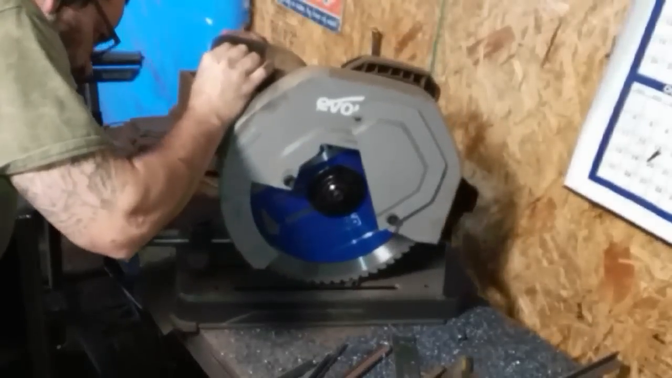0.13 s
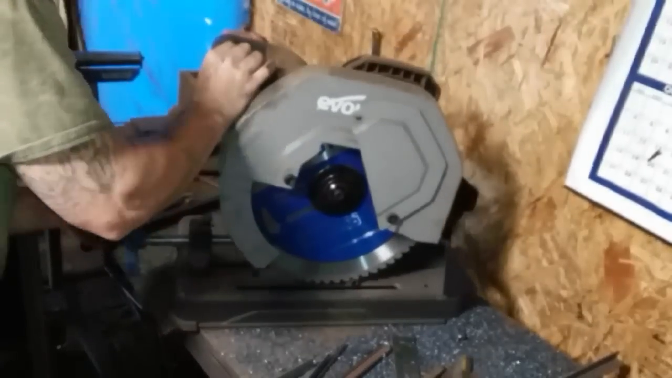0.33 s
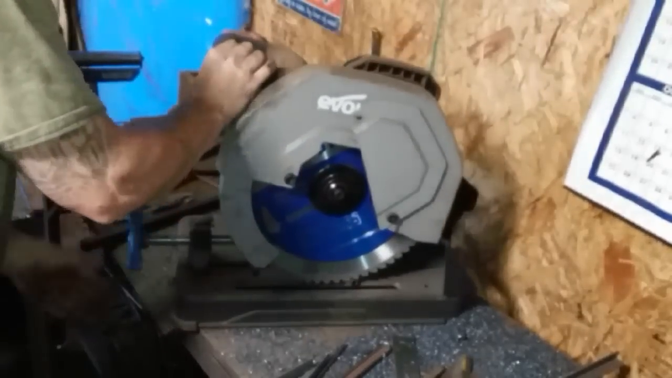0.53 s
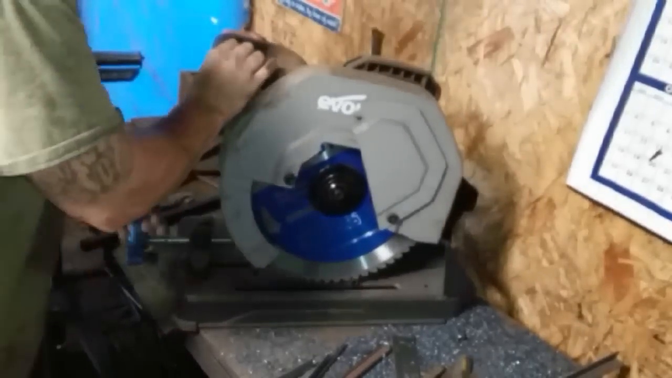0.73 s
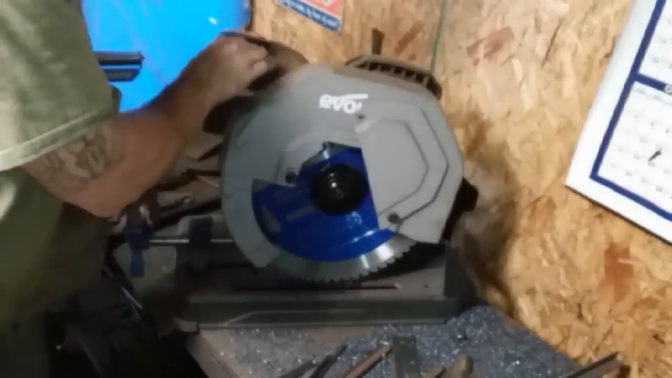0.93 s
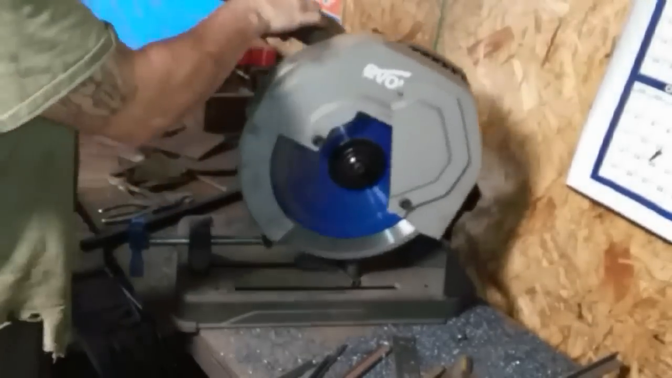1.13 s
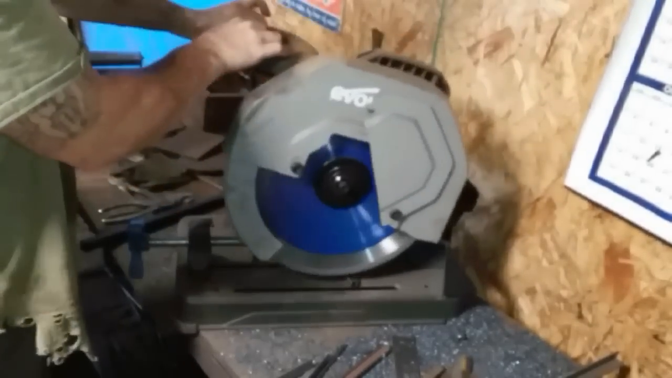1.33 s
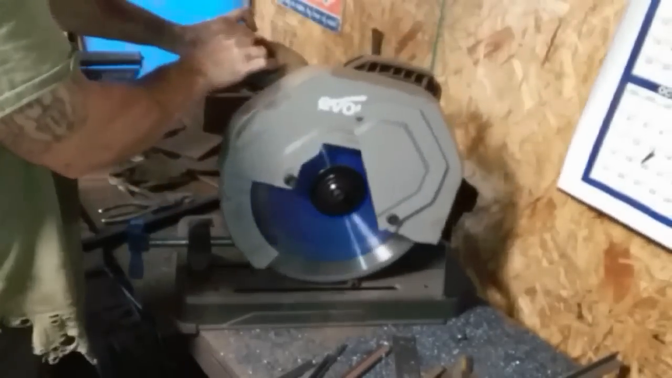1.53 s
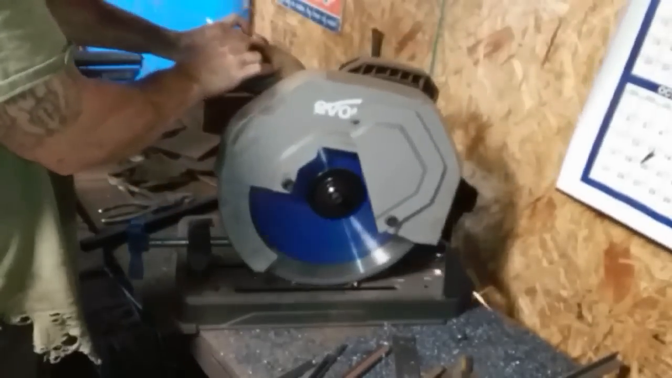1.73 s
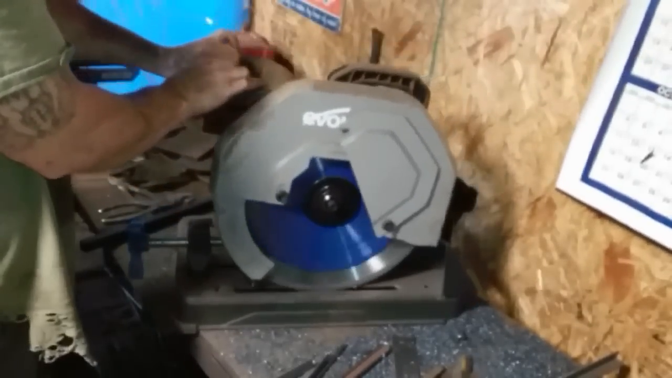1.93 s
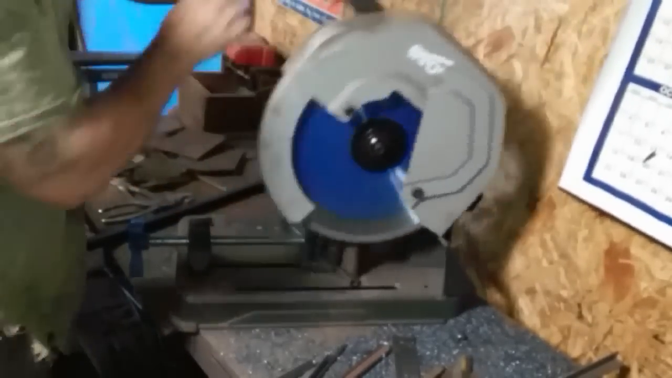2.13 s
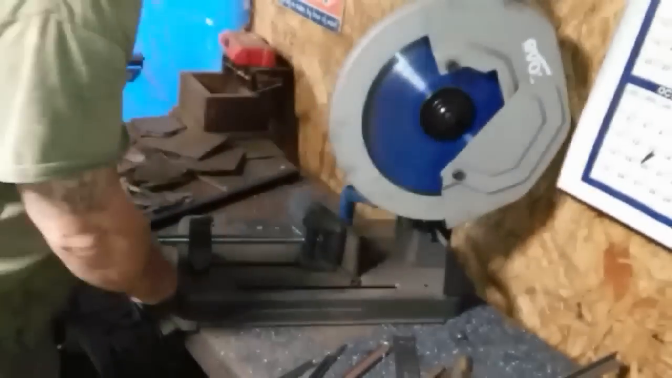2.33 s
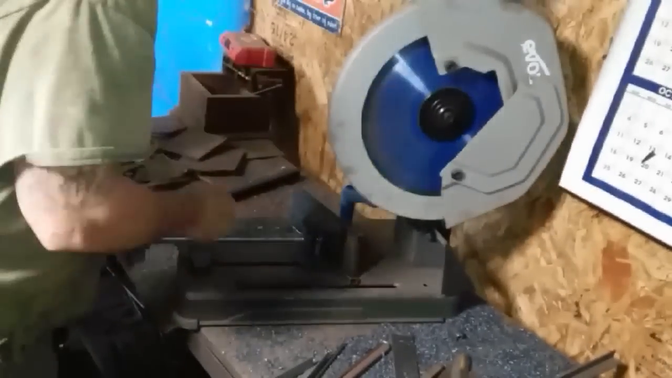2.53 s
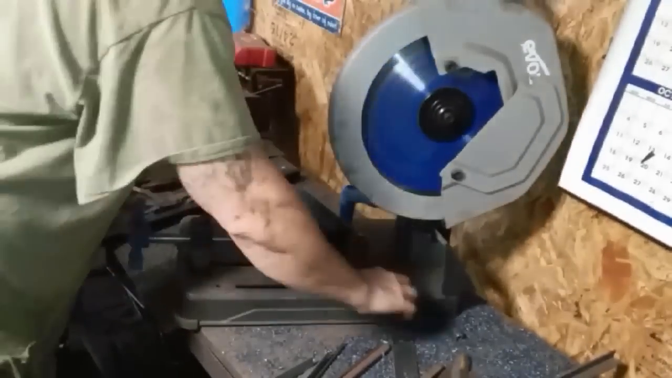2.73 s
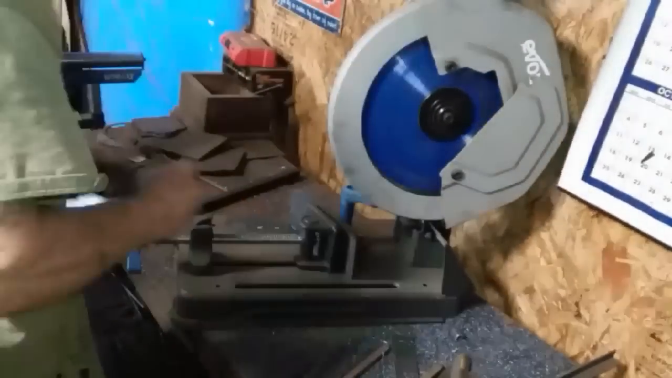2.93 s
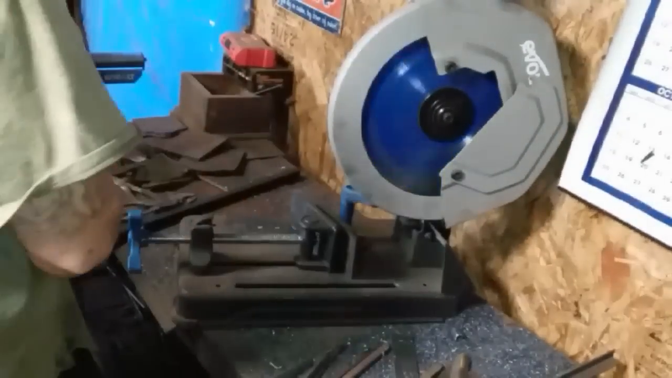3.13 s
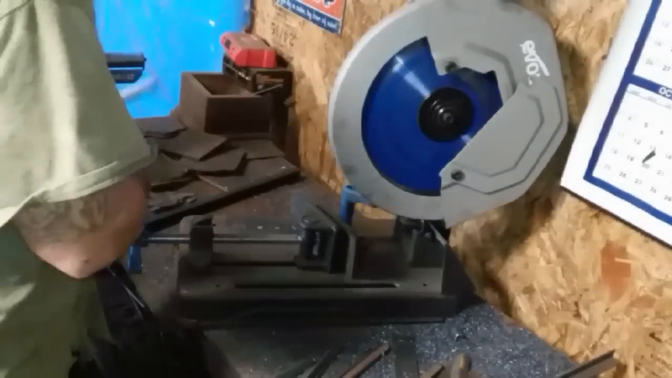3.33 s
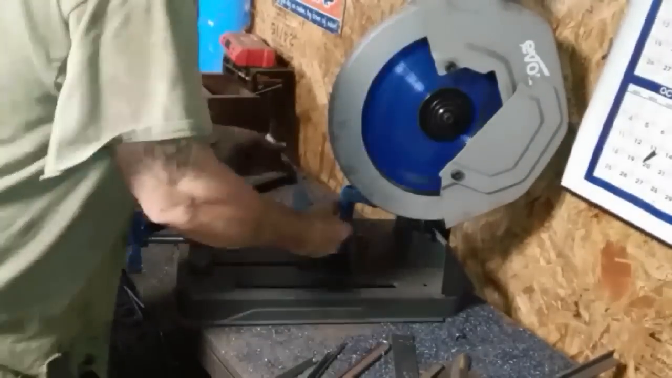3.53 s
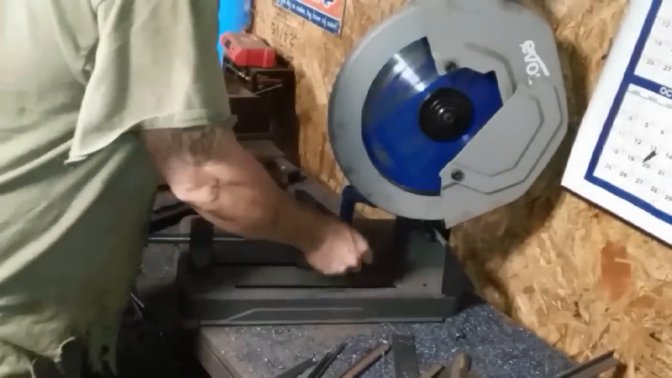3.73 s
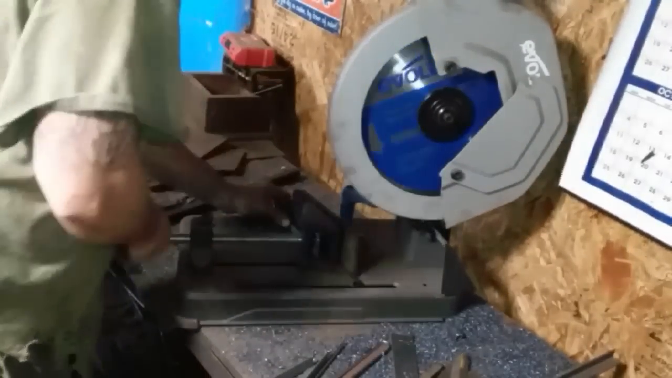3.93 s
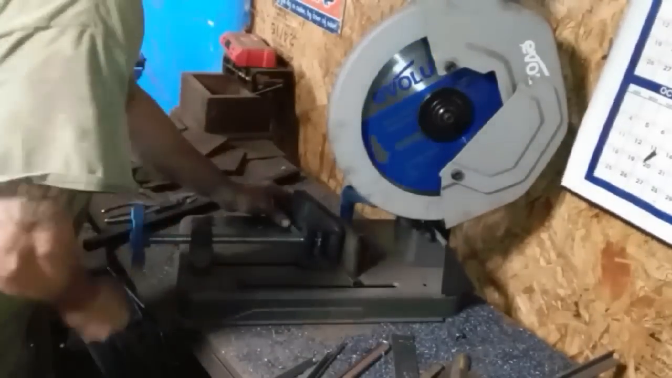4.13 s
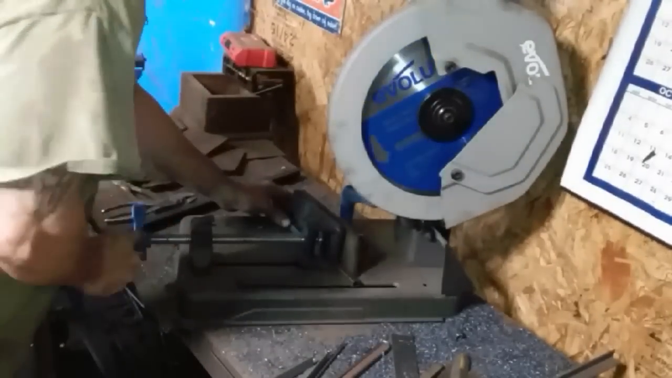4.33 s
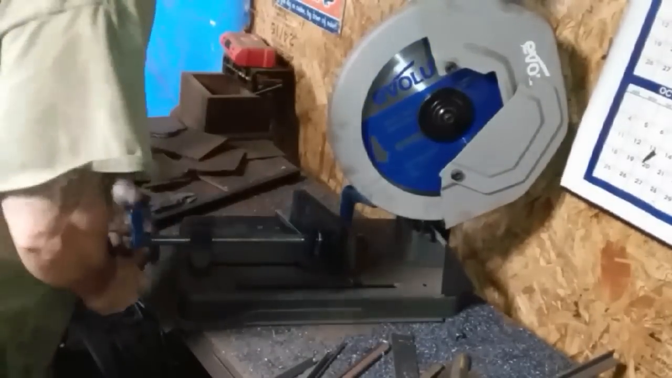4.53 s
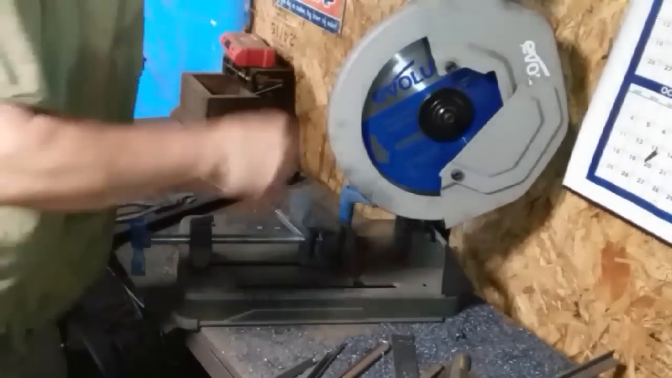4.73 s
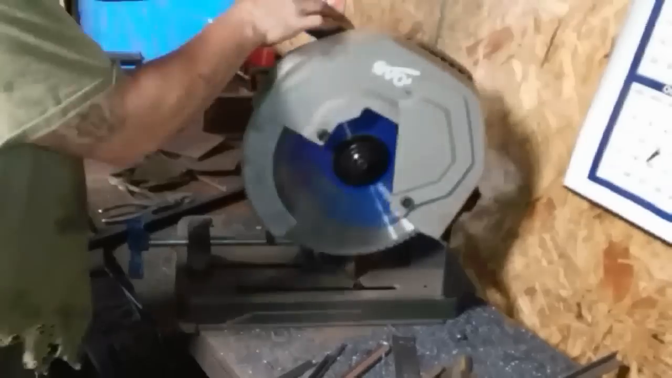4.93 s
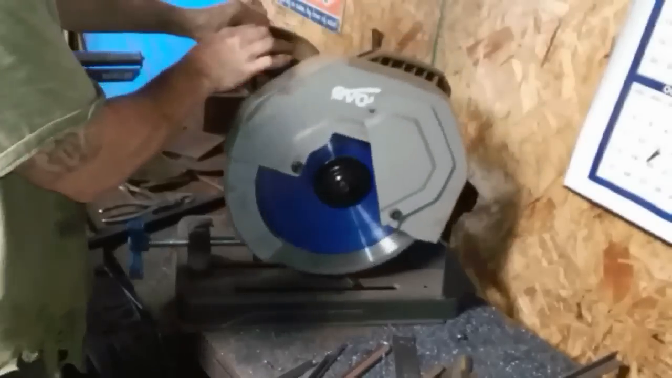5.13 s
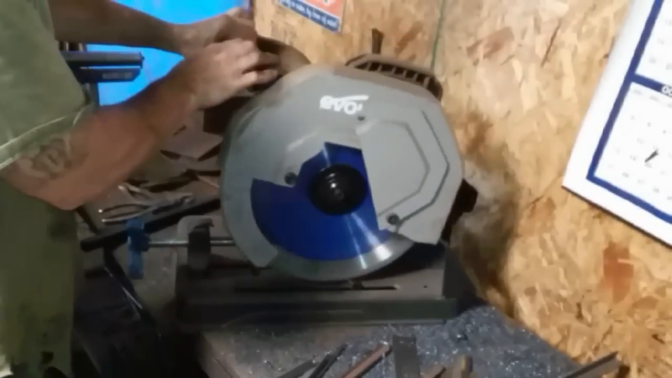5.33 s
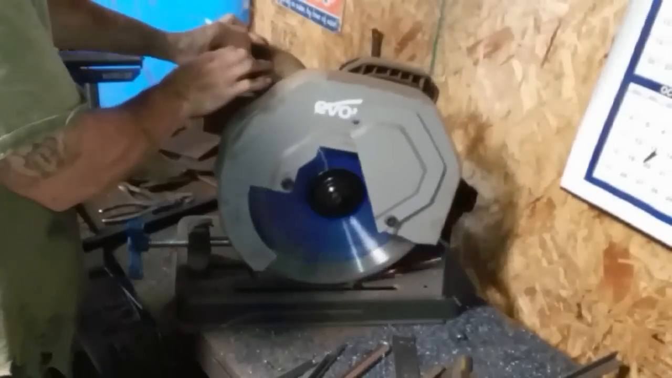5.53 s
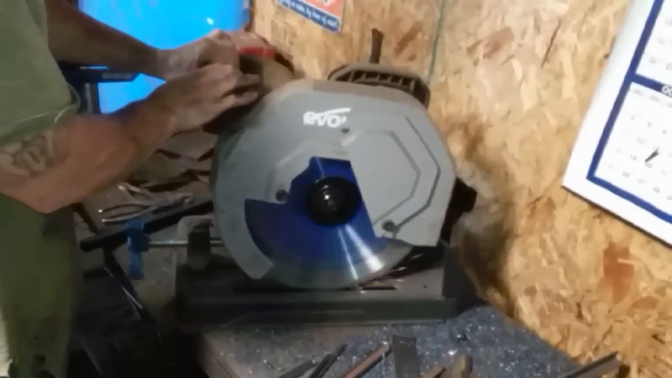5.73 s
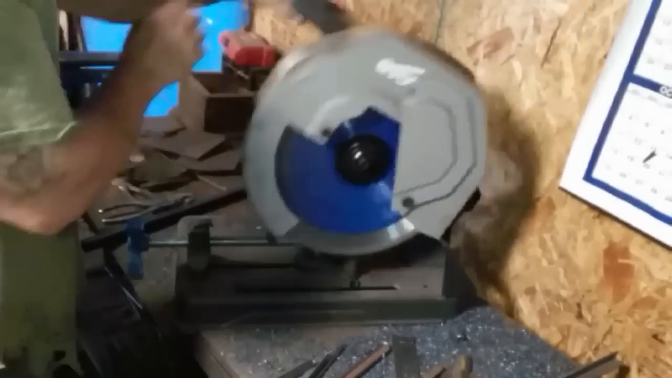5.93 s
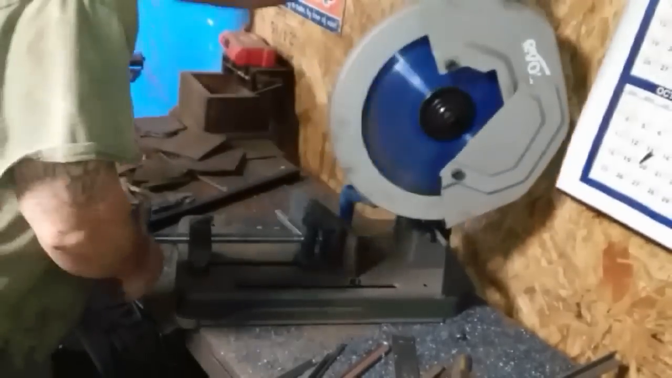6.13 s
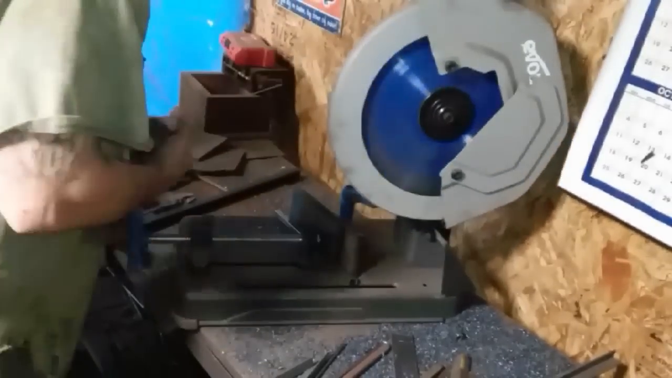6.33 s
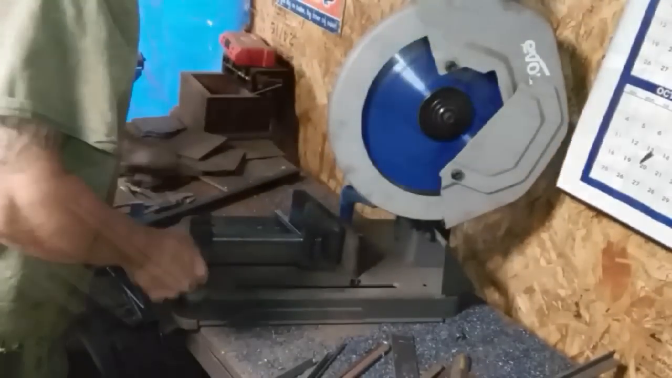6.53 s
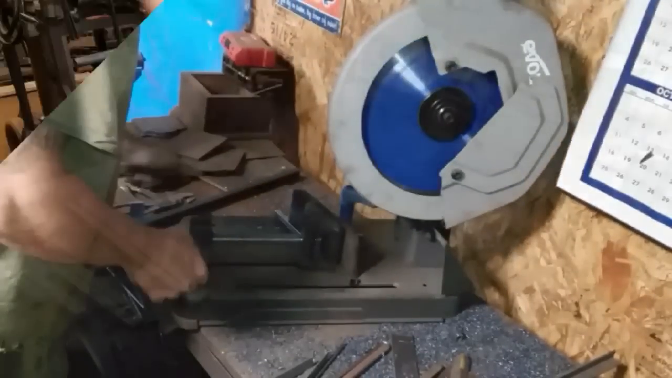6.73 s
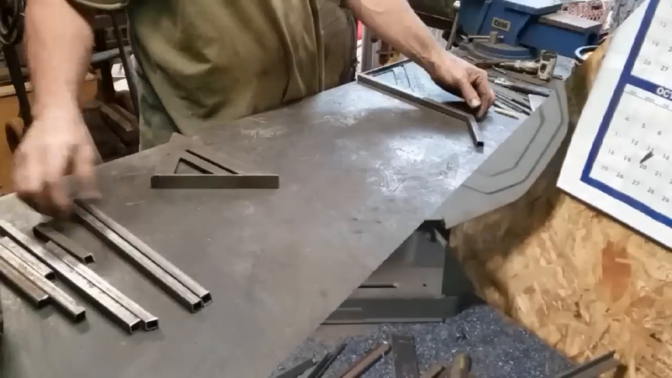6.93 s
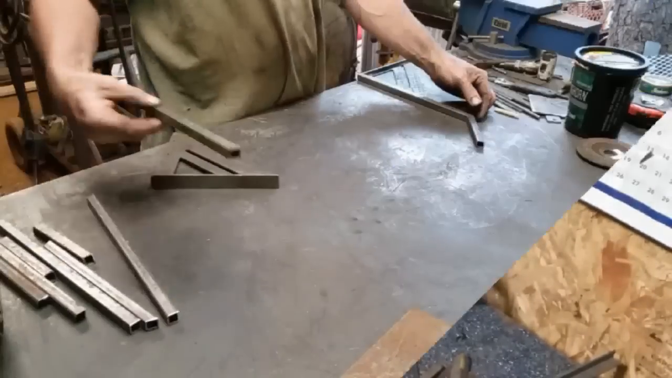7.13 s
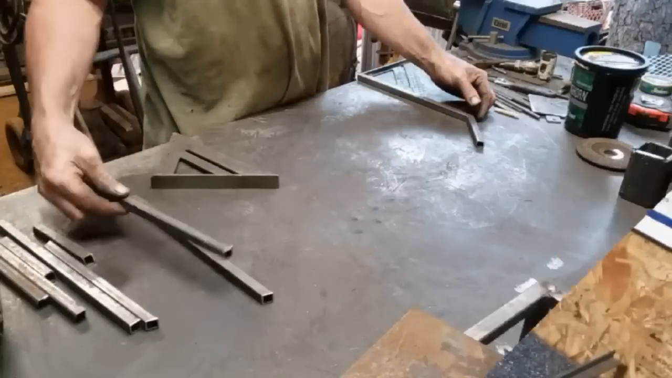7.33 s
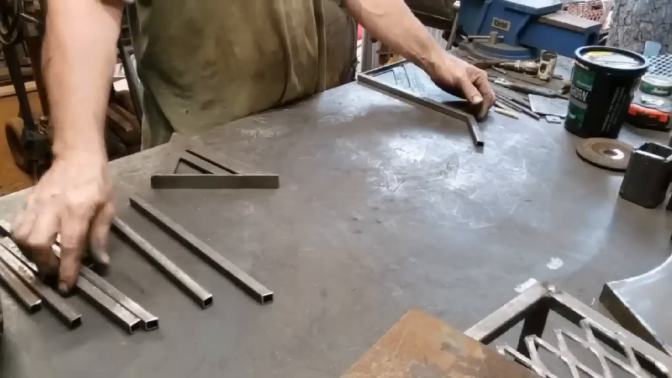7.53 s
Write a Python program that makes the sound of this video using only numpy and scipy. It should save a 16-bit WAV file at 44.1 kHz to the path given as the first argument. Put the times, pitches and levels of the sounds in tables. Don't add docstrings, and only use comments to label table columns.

```python
import sys
import numpy as np
from scipy import signal
from scipy.io import wavfile
from scipy.ndimage import uniform_filter1d

SR = 44100
rng = np.random.default_rng(int(sys.argv[2]) if len(sys.argv) > 2 else 0)


def generate_wav(sig):
    pcm = np.round(np.clip(np.atleast_2d(sig).T, -1, 1) * 32767).astype(np.int16)
    wavfile.write(sys.argv[1], SR, pcm)


def invert_db(x):
    u = np.asarray(x, float) / 20
    return 10 ** u


N = 334719

# (on [s], off [s], coasting drag [1/s], whine lost [s], start thump [dB])
RUNS = [
    (1.14, 2.114, .55, 3.225, -35),
    (4.959, 5.956, .62, 6.5, -38),
]
# (time [s], load [0-1], speed sag [Hz])
CUTS = [
    [(1.6, 0.08, 3.6), (1.7, 0.4, 13), (1.77, 0.55, 40), (1.83, 0.96, 72), (1.95, 0.7, 128),
     (2.04, 0.61, 95), (2.12, 0.27, 21), (2.2, 0.01, 5)],
    [(5.45, 0.07, 5.8), (5.55, 0.36, 31), (5.61, 0.83, 55), (5.67, 1, 270), (5.76, 0.87, 335),
     (5.83, 0.81, 350), (5.89, 0.59, 290), (5.956, 0.61, 108), (6.02, 0, 5)],
]
# (time [s], level on the whine [dB])
WHINE_SWELLS = [
    [(1.17, 2.5), (1.3, 2.5), (1.45, 1.5), (1.58, -1), (1.72, 2), (2.1, -4), (2.2, 2), (2.55, 0),
     (3.2, 1.5)],
    [(4.99, 2), (5.12, 4), (5.25, 0), (5.4, -1.5), (5.55, 0.5), (5.9, -2.5), (6.0, -0.5), (6.2, -1.5),
     (6.45, 0)],
]
# (time [s], level [dB])
CANCELS = [(1.225, -8), (1.256, -6), (1.285, -5), (1.345, -6), (1.406, -8), (1.446, -5), (1.48, -9),
           (1.578, -6), (2.125, -10), (2.242, -7), (2.272, -16), (2.318, -14), (2.362, -15), (2.4, -7),
           (2.432, -11), (2.526, -6), (2.575, -15), (2.74, -8), (2.794, -9), (2.83, -7), (3.0, -6),
           (4.995, -8), (5.039, -14), (5.072, -5), (5.158, -8), (5.206, -8), (5.245, -8), (5.318, -5),
           (5.398, -10), (6.07, -6), (6.15, -7), (6.216, -8), (6.28, -7), (6.36, -14), (6.432, -9)]
# (share of the whine pitch [1], level below it [dB])
SHAFT = [(.078, -11), (.166, -13.5)]
# (frequency [Hz], width [Hz], boost [dB])
PANELS = [(1625, 140, 7.5), (2140, 90, 10), (2390, 58, 6), (2676, 240, 10.5), (2927, 94, 9),
          (3376, 97, 9.5), (3570, 80, 6), (3763, 48, 11.5), (3920, 36, 7.5), (4000, 40, 6), (4180, 120, 9),
          (4310, 40, 6), (4446, 97, 10)]
# (first [dB], second [dB])
BURIED_DB = (-24, -11.5)
# (full speed [dB], added at rest when driven [dB], when coasting [dB],
# added by load [dB], power of the last die-away [1])
LAYERS = [
    (-29, 10, 6.5, -5, 1.09),
    (-22.5, 0.5, -10, -5, 1.15),
    (-32, -11, -14.5, 7.5, 1.2),
    (-64.5, 13, 19, 33, 0.41),
]
BITE = (1.3, 1.4, 0.72, 2.46)
# (frequency [Hz], density [dB/Hz])
RATTLE = [(110, -39.5), (180, -14.5), (402, -8.5), (506, -3), (1040, -1), (1360, -3), (1600, -8.5),
          (2080, -30.5), (3520, -120)]
RUSH = [(880, -9.5), (1500, -5.5), (1650, -2.5), (2160, -4), (2960, -5), (4800, -18.5), (6240, -52),
        (10600, -120)]
FIZZ = [(2710, -16.5), (4600, -4.5), (5630, -3), (7780, -8.5), (8530, -16), (8850, -30), (9000, -41.5),
        (11700, -72), (19800, -120)]
RUMBLE = [(30, -23), (80, -3), (200, -2.5), (320, -1)]
# (frequency [Hz], density [dB/Hz])
SIZZLE = [(8600, -8), (9400, -8), (10500, -5.5), (12300, -1), (14200, -8.5), (15800, -14)]
BEARING = [(10000, -31.5), (11200, -7.5), (12400, -5.5), (13600, -11.5), (14800, -34.5)]
# (frequency [Hz], width [Hz], boost [dB])
HOUSING = [(482.7, 52, 7.5), (705, 89, 3), (1156, 160, 2), (1353, 83, 6), (1700, 48, -2), (2075, 94, 2),
           (2900, 70, 3.5), (3425, 99, 6.5), (3725, 120, 6.5)]
# (frequency [Hz], density [dB/Hz])
PLATE = [(900, -30), (1200, -4.5), (4000, -2), (7000, -6), (8200, -30)]
# (frequency [Hz], width [Hz], boost [dB])
BLADE = [(1207, 40, 12.5), (2075, 40, 14), (2535, 40, 14.5), (2900, 41, 14), (3420, 40, 13.5),
         (3610, 44, 15), (3740, 40, 14.5), (4110, 40, 14), (4760, 40, 11), (5300, 50, 13.5), (5480, 40, 15),
         (6430, 37, 14.5), (6880, 40, 13), (7500, 40, 11)]
# (start [s], end [s])
CUT_SPANS = [(1.55, 2.3), (5.4, 6.1)]
# (time [s], length [s], start pitch [Hz], end pitch [Hz], level [dB])
SQUEALS = [(1.25, 0.29, 1300, 1285, -34), (5.101, 0.39, 1305, 1305, -34.5), (1.74, .06, 2075, 2070, -29),
           (1.8, .22, 7500, 7480, -44), (1.86, 0.23, 6540, 6500, -36.5), (1.93, 0.088, 2900, 2900, -27),
           (2.03, 0.15, 1190, 1192, -47), (2.26, 0.63, 1180, 1130, -29), (2.531, .12, 665, 628, -32),
           (2.75, 0.25, 511, 479, -32.5), (3.194, 0.0364, 5320, 5340, -31.5), (3.8, 1.17, 1048, 1039, -47),
           (3.95, 0.91, 794, 793, -47.5), (5.6, 0.28, 6630, 6540, -35), (5.68, 0.18, 5320, 5300, -34.5),
           (5.83, 0.22, 1187, 1182, -37.5), (5.959, 0.047, 2050, 2075, -28.5),
           (6.05, 0.39, 1174, 1166, -27.5)]
# (time [s], length [s], start pitch [Hz], end
# pitch [Hz], level [dB])
SAW_NOTES = [(1.62, 0.083, 4170, 4150, -32), (1.63, .18, 1113, 1100, -33.5), (1.89, 0.12, 5485, 5465, -37.5),
             (1.93, .17, 2530, 2538, -34), (1.93, .12, 1197, 1190, -32.5), (1.94, 0.19, 3500, 4735, -40),
             (2.08, .05, 2073, 2073, -32.5), (5.54, .09, 4110, 4130, -28.5), (5.63, .09, 4100, 4100, -33),
             (5.62, .11, 5460, 5485, -31), (5.64, 0.052, 2715, 2712, -33), (5.715, 0.078, 2535, 2525, -25.5),
             (5.79, 0.17, 2525, 2530, -33), (5.76, .15, 3822, 3825, -32), (5.73, .13, 5700, 5185, -39),
             (5.68, 0.16, 1197, 1190, -34), (5.15, 0.275, 3680, 3730, -30),
             (2.2, .06, 345, 335, -38), (2.4, .15, 280, 255, -40), (2.69, .18, 228, 185, -39),
            (2.47, .1, 525, 505, -37), (3.0, .16, 385, 340, -41), (2.9, .12, 1115, 1110, -36),
            (3.22, .26, 1100, 1085, -36), (3.27, .07, 765, 755, -34), (3.53, .1, 470, 455, -38),
            (3.08, .08, 1005, 995, -34), (3.3, .3, 1420, 1400, -42), (1.9, .12, 2740, 2735, -36),
            (5.85, .09, 2530, 2530, -35), (5.7, .16, 5260, 5240, -35), (5.66, .1, 6520, 6480, -35)]
# (time [s], length [s], multiple of the tooth rate [1], level [dB])
TEETH = [(1.66, .08, 3, -33), (1.659, 0.058, 2, -29.5), (1.65, .17, 5, -37), (1.742, 0.165, 4, -25.5),
         (1.773, .13, 2, -31.5), (1.795, .13, 3, -27), (1.785, .15, 5, -32), (1.822, 0.078, 1, -32.5),
         (1.93, .1, 4, -44), (1.95, .095, 3, -24), (5.499, 0.065, 2, -29.5), (5.5, 0.13, 4, -41),
         (5.499, 0.04, 5, -36), (5.59, 0.066, 2, -22.5), (5.67, 0.19, 1, -30)]
# (time after trigger [s], length [s], start pitch [Hz], end pitch [Hz], level [dB])
GROWLS = [
    (.01, .06, 400, 410, -30),
    (0.0081, .09, 492, 485, -22.5),
    (.095, .07, 480, 468, -27),
    (0.0065, 0.033, 650, 690, -27.5),
    (0.04, .13, 646.5, 675, -31),
]
# (time [s], length [s], pitch [Hz], level [dB])
PINGS = [(1.13, .05, 12300, -53), (1.13, .05, 10500, -52), (1.39, 0.17, 3660, -35), (1.37, 0.13, 3400, -35),
         (2.12, .07, 3740, -33), (2.22, .1, 3610, -33), (3.4, 0.32, 2210, -43), (3.183, .06, 5280, -38),
         (3.423, 0.036, 3090, -37), (3.475, .025, 3080, -40), (3.977, 0.013, 3420, -47),
         (3.978, 0.0119, 4970, -44), (3.979, 0.01, 6000, -46), (3.979, .012, 7150, -43)]
# (time [s], length [s], start pitch [Hz], end pitch [Hz], level [dB])
HUM = [
    (0, 1.19, 67.7, 66.5, -54.5),
    (0, 1.1, 132, 134, -61.5),
    (0, 1.46, 199.1, 198.8, -52.5),
    (3.7, 0.96, 206.2, 206, -52),
    (3.703, 1.52, 69.6, 73.9, -60),
]
# (time [s], peak [dB], centre [Hz], treble below the peak [dB], left-right [dB])
KNOCKS = [(0.047, -35.5, 557, 6.5, 1.0), (0.219, -35, 900, -5, 0), (0.552, -36, 600, 1, 0),
          (0.688, -29.5, 500, -9, 0), (0.495, -30, 450, -8, 0), (0.319, -30, 1330, -24, -11),
          (0.409, -19, 1140, -9.5, 3), (0.509, -25.5, 487, -15, -2), (0.671, -25, 498, -3.5, 2),
          (0.791, -38, 404, 2, 4), (0.859, -46, 466, -15, -1), (3.195, -20, 920, 3, -3.5),
          (3.213, -16, 670, 0, 1), (3.229, -22, 900, 0, -1), (2.372, -17, 480, -14, 0),
          (3.795, -25.5, 800, -5, 0), (3.804, -17.5, 780, -6.5, -2), (3.98, -23.5, 850, -11, -2.5),
          (4.054, -19, 750, -10, 3), (4.182, -21, 660, -14, 3.5)]
# (time [s], peak [dB], rise [s], fall [s], ring [dB])
TUBES = [(6.659, -57, .002, .01, -70), (6.967, -45, 0.014, 0.016, -41.5),
         (7.033, -34.5, 0.015, 0.012, -34.5), (7.206, -23, 0.003, 0.016, -28),
         (7.213, -24, 0.0063, 0.041, -26), (7.243, -24, 0.022, 0.015, -19), (7.338, -38, 0.003, 0.014, -50),
         (7.405, -29, 0.0029, 0.037, -33), (7.436, -27, 0.013, 0.005, -21), (7.453, -26, 0.003, .02, -20),
         (7.512, -41, 0.003, 0.016, -58), (7.575, -27, 0.0031, 0.019, -37)]
# (frequency [Hz], level [dB])
TUBE_MODES = [(2880, -4), (5400, -4), (8600, -12.5)]
# (frequency [Hz], density [dB/Hz])
SCRAPE = [(71, -52), (120, -11.5), (707, -13.5), (1250, -12), (2350, -2), (3130, -10), (4250, -6.5),
          (5100, -12.5), (5540, -7), (8670, -24), (9790, -34), (12300, -22), (14700, -40), (15800, -48)]
# (time [s], pitch [Hz], level [dB], fall [s])
CLINKS = [(0.409, 463, -32, .02), (0.409, 1039, -34, .02), (0.409, 1254, -29, .018),
          (0.409, 5243, -38, .01), (3.982, 820, -33, .007), (4.055, 393, -34, .016),
          (4.055, 754, -25, .012), (4.055, 1050, -32, .014), (4.055, 2121, -36, .008),
          (4.185, 620, -32, .014), (4.187, 1050, -34, .012), (7.208, 300, -33, .012),
          (7.208, 2401, -29, .02), (7.209, 2676, -28, .018), (7.213, 4156, -33, .02),
          (7.23, 2300, -33, .015), (7.339, 2900, -46, .012), (7.339, 1710, -46, .012),
          (7.406, 300, -36, .01), (7.406, 2342, -31, .02), (7.406, 3655, -31, .014),
          (7.406, 3182, -38, .014), (7.406, 4517, -39, .016), (7.275, 5400, -42, .04),
          (7.47, 5420, -44, .04), (7.516, 2120, -46, .015), (7.576, 2180, -30, .014),
          (7.576, 2800, -33, .014), (7.577, 3700, -35, .012), (7.578, 5400, -31, .014),
          (2.365, 220, -34, .02), (3.215, 260, -32, .03)]
# (frequency [Hz], density [dB/Hz])
SHOP = [(15, -39), (25, -18.5), (70, -2.5), (144, -18), (194, -6), (471, -2), (511, -3.5), (786, -6),
        (1310, -4.5), (1460, -7), (6610, -22), (7360, -24), (9130, -41), (13000, -33), (15600, -54.5)]
BENCH = [(15, -48), (25, -36), (129, -12), (199, -11), (634, -11.5), (725, -9.5), (1150, -12),
         (1420, -10.5), (1630, -12), (7560, -29), (9380, -50), (13000, -36), (15600, -56)]
# (frequency [Hz], coherence [0-1])
SAME = [(60, 0.52), (150, 0.93), (380, 0.94), (700, 0.92), (1300, 0.12), (2400, 0.19), (6000, 0.12),
        (9000, 0.18), (15000, .05)]
# (frequency [Hz], phase [rad])
LEAD = [(0, 1), (860, -0.93), (4480, 0.39), (9130, -2.2), (10600, -1.5), (15300, -6)]
# (frequency [Hz], level [dB])
LEAN = [(60, -1), (150, -1.5), (380, -1), (950, 1.0), (2380, -2), (5980, -1.5), (15000, -3.5)]
# (time [s], length [s])
STARVED = [
    (1.26, .09),
    (1.6, .12),
    (2.02, .13),
    (2.26, .08),
    (5.52, .05),
    (5.84, .09),
]

SLICE_HZ = 46.875
TOP_HZ, KICK_HZ, SPIN_UP_S, FRICTION_HZ = 4575, 1107, 0.155, 2262
BREAKAWAY_S = 0.016
TOOTH_SHARE = 0.308
WHINE_DB, COAST_DB, BURIED_LOAD, FLUTTER_DB = -30.5, -2, 0.48, 1.5
CANCEL_S = 0.009
CRAWL = 0.29
DELAY_S, START_S, AIRFLOW_S, THUMP_S = 0.0023, 0.014, 0.11, 0.018
LABOUR_DB_PER_HZ = -0.0044
BLADE_DB = -34
AIR_DB, DUCK_KNEE_DB, DUCK_POWER, BENCH_AIR_DB = -42.5, -30, 1.1, -42
SHUFFLE_S, SHUFFLE_WIDTH_S, SHUFFLE_DB = 4.89, 0.13, 3.5
CUT_OFF_S, CUT_RAMP_S = 6.497, 0.022
FADE_OUT_S, DARK_S, FADE_IN_S, LIGHT_S = 0.6, 6.629, 0.45, 6.585
BASS_EDGE_HZ, STARVED_DB = 190, -18
SAW_SPAN, CLAMP_SPAN, SHOP_SPAN, BENCH_SPAN = (1.1, 6.6), (0, 4.4), (0, 6.6), (6.4, 8)


def evened(x):
    return x / np.sqrt(np.mean(x ** 2) + 1e-20)


def read(points, hz, outside=None):
    f, value = np.transpose(points)
    return np.interp(np.log(np.abs(hz) + 1), np.log(f + 1), value, outside, outside)


def resonances(modes, hz):
    return sum(boost / (1 + (2 * (hz - f) / width) ** 2) for f, width, boost in modes)


def noise(spectrum, boosts=(), patchy_db=0.5, span=(0, 8)):
    hz = np.fft.rfftfreq(1024, 1 / SR)
    first, last = int(span[0] * SR), min(int(span[1] * SR), N)
    a, b, c, d, patches = rng.standard_normal((5, (last - first) // 256 + 5, 513), dtype=np.float32)
    patches = uniform_filter1d(patches, size=8, axis=1)
    patches = evened(uniform_filter1d(patches, size=6, axis=0))
    db = read(spectrum, hz, -120) + resonances(boosts, hz) + patchy_db * patches
    same = np.clip(read(SAME, hz), -1, 1)
    lean = invert_db(read(LEAN, hz) / 2)
    left = a + 1j * b
    right = same * np.exp(-1j * read(LEAD, hz)) * left + np.sqrt(1 - same ** 2) * (c + 1j * d)
    z = (np.array([left * lean, right / lean]) * invert_db(db)).astype(np.complex64)
    part = signal.istft(z, nperseg=1024, noverlap=768, time_axis=1, freq_axis=2)[1][:, :last - first]
    out = np.zeros((2, N))
    out[:, first:last] = part / np.sqrt(np.mean(part.mean(0) ** 2))
    return out


def sliced(jump_db, dip):
    at = np.arange(N) * SLICE_HZ / SR
    levels = np.clip(rng.standard_normal(int(at[-1]) + 2), -3, 1.6)
    return invert_db(jump_db * np.interp(at, np.arange(len(levels)), levels)) * (1 + dip * np.cos(2 * np.pi * at))


def tone(hz, wander_hz=9.0, swap=0.9, slip=0.6, speedup=2.2):
    at = np.arange(len(hz)) * SLICE_HZ / SR
    drift = uniform_filter1d(rng.standard_normal((len(hz), 3)), size=700, axis=0)
    drift = evened(uniform_filter1d(drift, size=700, axis=0)).T
    hz = hz + wander_hz * drift[0]
    turns = 2 * np.pi * np.cumsum(hz) / SR
    slips = slip * rng.standard_normal(int(at[-1]) + 3)
    lag = read(LEAD, hz) + swap * drift[1]
    lean = invert_db(read(LEAN, hz) / 2 + 0.62 * drift[2])
    out = np.zeros((2, len(hz)))
    for odd in (0, 1):
        middle = 2 * np.round((at - odd) / 2) + odd
        held = np.interp(middle, at, turns) + 2 * np.pi * np.interp(middle, at, hz) * (at - middle) / SLICE_HZ
        phase = held + (turns - held) / speedup + slips[middle.astype(int)]
        ports = np.array([lean * np.sin(phase + lag / 2), np.sin(phase - lag / 2) / lean])
        out += np.cos(np.pi / 2 * (at - middle)) ** 2 * ports
    return np.sqrt(2) * out


def add(mix, s, rise, fall, sound):
    t = np.arange(int((rise + 3 * fall) * SR)) / SR
    span = slice(int(s * SR), min(int(s * SR) + len(t), N))
    shape = np.clip(t / rise, 0, 1) * np.exp(-np.clip(t - rise, 0, None) / (fall / 1.71))
    mix[:, span] += sound(span) * shape[:span.stop - span.start]


def drive():
    t = np.arange(N) / SR
    s, load, sag = np.transpose(CUTS[0] + CUTS[1])
    load = np.clip(np.interp(t, s, load), 0, 1)
    sag = np.interp(t, s, sag)
    hz, driven, singing = np.zeros((3, N))
    for on, off, drag, lost, _ in RUNS:
        rising = TOP_HZ - (TOP_HZ - KICK_HZ) * np.exp(-np.abs(t - on) / SPIN_UP_S) - sag
        rising = rising * (1 - np.exp(-np.abs(t - on) / BREAKAWAY_S))
        falling = (rising[int(off * SR)] + FRICTION_HZ) * np.exp(-drag * (t - off)) - FRICTION_HZ
        hz = np.where(t < on, hz, np.maximum(np.where(t < off, rising, falling), 0))
        driven += (t >= on) & (t < off)
        singing += np.clip(np.minimum((t - on) / 0.028, (lost - t) / 0.015), 0, 1)
    return hz, load, np.clip(uniform_filter1d(driven, size=2000), 0, 1), singing, sag


def whine(hz, load, driven, singing, buried_db):
    shaft = 0
    for share, below_db in SHAFT:
        audible = np.clip(share * hz / 154.0 - 0.6, 0, 1)
        shaft = shaft + invert_db(below_db) * audible * tone(share * hz, wander_hz=14.0)
    flutter = uniform_filter1d(rng.standard_normal(len(hz)), size=500)
    flutter = evened(uniform_filter1d(flutter, size=400))
    db = WHINE_DB + COAST_DB * (1 - driven)
    db += buried_db * np.clip((load - BURIED_LOAD) / 0.35, 0, 1)
    db += FLUTTER_DB * np.clip(flutter, -3, 1.2)
    mesh = invert_db(resonances(PANELS, hz)) * tone(hz, slip=0.12, swap=0.35)
    return singing ** 2 * invert_db(db) * (mesh + (0.46 + 0.55 * driven) * shaft)


def whine_gain(t):
    swell_db = np.interp(t, *np.transpose(WHINE_SWELLS[0] + WHINE_SWELLS[1]))
    return invert_db(swell_db + sum(db * np.exp(-((t - s) / CANCEL_S) ** 2) for s, db in CANCELS))


def layers(hz, load, driven):
    t, share = np.arange(N) / SR, hz / TOP_HZ
    lost = 1 - np.maximum(share, CRAWL)
    since = np.min([np.where(t < on - DELAY_S, 9, t - on - DELAY_S) for on, *_ in RUNS], axis=0)
    gears = np.clip(since / START_S, 0, 1)
    air = np.clip(since / AIRFLOW_S + 0.29, 0, 1) * gears
    alive = np.where(driven > 0.5, 1, np.clip(share / CRAWL, 0, 1))
    gains = []
    for (db, on_db, off_db, load_db, power), start, bite in zip(LAYERS, (gears, air, air, gears), BITE):
        speed_db = lost * (driven * on_db + (1 - driven) * off_db)
        gains.append(start * alive ** power * invert_db(db + speed_db + load_db * load ** bite))
    thump = sum(invert_db(db) * (t > on) * np.exp(-np.abs(t - on) / THUMP_S) for on, *_, db in RUNS)
    return gains[:3] + [gains[3] + thump]


def motor(rattle, rush, fizz, rumble):
    out = invert_db(-1.15) * rattle * sliced(1.9, 0.12) * noise(RATTLE, HOUSING, span=SAW_SPAN)
    out += invert_db(-2.5) * rush * sliced(1.0, 0.14) * noise(RUSH, HOUSING, span=SAW_SPAN)
    out += invert_db(-1.0) * fizz * sliced(1.4, 0.13) * noise(FIZZ, span=SAW_SPAN)
    out += invert_db(9.5) * fizz ** 1.767 * noise(SIZZLE, patchy_db=4.5, span=SAW_SPAN)
    bearing = np.minimum(uniform_filter1d(rattle, size=8001, origin=4000), rattle)
    out += invert_db(-16.5) * np.clip(bearing, 0, 1) ** 1.45 * noise(BEARING, patchy_db=4.0, span=SAW_SPAN)
    return out + rumble * sliced(4.5, 0.05) * noise(RUMBLE, patchy_db=2.5, span=SAW_SPAN)


def blade(load):
    plate = sum(noise(PLATE, BLADE, patchy_db=5.0, span=span) for span in CUT_SPANS)
    return invert_db(BLADE_DB) * load ** 0.64 * sliced(3.5, 0.25) * plate


def squeals(tooth_hz):
    def glide(hz0, hz1, length):
        return np.linspace(hz0, hz1, round(length * SR))

    notes = [(s, glide(hz0, hz1, length), db, 5.4) for s, length, hz0, hz1, db in SQUEALS + HUM]
    notes += [(s, glide(hz0, hz1, length), db, 14.0) for s, length, hz0, hz1, db in SAW_NOTES]
    notes += [(s, glide(hz, hz, length), db, 45.0) for s, length, hz, db in PINGS]
    for s, length, k, db in TEETH:
        notes.append((s, round(k) * tooth_hz[round(s * SR):][:round(length * SR)], db, 13.0))
    for on, *_ in RUNS:
        notes += [(on + s, glide(hz0, hz1, length), db, 18.0) for s, length, hz0, hz1, db in GROWLS]
    out = np.zeros((2, N))
    for s, hz, db, wander_hz in notes:
        window = signal.windows.tukey(len(hz), min(0.4, 2000 / len(hz)))
        out[:, round(s * SR):][:, :len(hz)] += invert_db(db) * window * tone(hz, wander_hz=wander_hz)
    return out * sliced(1.8, 0.2)


def knocks():
    out, crack, raw = np.zeros((2, N)), noise(SCRAPE, span=CLAMP_SPAN), rng.standard_normal(N)
    for s, db, hz, treble_db, pan_db in KNOCKS:
        band = signal.butter(N=1, Wn=[hz / 2.54, hz * 1.48], btype="band", fs=SR, output="sos")
        gain = invert_db(db - 9.5 + np.array([[pan_db], [-pan_db]]) / 2)

        def thud(span):
            return gain * evened(signal.sosfilt(band, signal.sosfilt(band, raw[span])))

        add(out, s - 0.003, 0.007, 0.024, thud)
        add(out, s, 0.004, 0.018, lambda span: gain * invert_db(treble_db) * crack[:, span])
    return out


def tubes():
    out, grit = np.zeros((2, N)), noise(SCRAPE, patchy_db=3.5, span=BENCH_SPAN)
    for s, db, rise, fall, ring_db in TUBES:
        def ring(span):
            length = span.stop - span.start
            return sum(invert_db(ring_db + mode_db) * tone(np.full(length, hz), wander_hz=15.5)
                       for hz, mode_db in TUBE_MODES)

        add(out, s, rise, fall, lambda span: invert_db(db) * grit[:, span])
        add(out, s, 1.24 * rise, 0.77 * fall, ring)
    return out


def clinks():
    out = np.zeros((2, N))
    for s, hz, db, fall in CLINKS:
        def ring(span):
            return invert_db(db) * tone(np.full(span.stop - span.start, hz), wander_hz=12.0, swap=0.4)

        add(out, s, 0.0015, fall, ring)
    return out


def workshop(loud):
    recent = np.abs(uniform_filter1d(loud, size=2001, origin=1000))
    ducking = (1 + recent / invert_db(DUCK_KNEE_DB)) ** -DUCK_POWER
    shuffle_db = SHUFFLE_DB * np.exp(-((np.arange(N) / SR - SHUFFLE_S) / SHUFFLE_WIDTH_S) ** 2)
    air = noise(SHOP, patchy_db=1.0, span=SHOP_SPAN)
    return invert_db(AIR_DB + shuffle_db) * ducking * sliced(1.8, 0.1) * air


def bench():
    return invert_db(BENCH_AIR_DB) * noise(BENCH, patchy_db=2.0, span=BENCH_SPAN)


def scene():
    t = np.arange(N, dtype=np.float32) / SR
    controls = np.array(drive())
    hz, load, driven, _, sag = controls
    gains = layers(hz, load, driven)
    sung = np.zeros((2, N))
    for (on, _, _, lost, _), buried_db in zip(RUNS, BURIED_DB):
        span = slice(int(on * SR), int(lost * SR))
        sung[:, span] = whine(*controls[:4, span], buried_db)
    saw = whine_gain(t) * sung * sliced(1.6, 0.13)
    saw += invert_db(LABOUR_DB_PER_HZ * sag) * motor(*gains)
    saw += blade(load) + squeals(TOOTH_SHARE * hz) + knocks()
    saw += workshop(gains[0] + gains[1])
    fade_out = np.clip((DARK_S - t) / FADE_OUT_S, 0, 1) * np.clip((CUT_OFF_S - t) / CUT_RAMP_S, 0, 1) ** 2
    fade_in = np.clip((t - LIGHT_S) / FADE_IN_S, invert_db(-60.0), 1)
    return saw * fade_out + tubes() + clinks() + bench() * fade_in


def thinned(x, edge_hz=8200.0, under_db=-23.5):
    hz, _, z = signal.stft(x, SR, nperseg=1024, noverlap=768)
    power = uniform_filter1d(abs(z) ** 2, size=3, axis=2)
    around = uniform_filter1d(power, size=30, axis=1)
    threshold = np.sqrt(abs(around * power.sum(1, keepdims=True))) * invert_db(2 * under_db)
    hidden = (power < threshold) & (hz > edge_hz)[:, None]
    at = np.arange(z.shape[2]) * 256 / SR
    starved = sum((at > s) & (at < s + length) for s, length in STARVED)
    starved = starved * np.clip((BASS_EDGE_HZ - hz[:, None]) / 60.0, 0, 1)
    return signal.istft(z * ~hidden * invert_db(STARVED_DB * starved), SR, nperseg=1024, noverlap=768)[1][:, :N]


def top_cut(x):
    return signal.sosfilt(signal.butter(12, 15800, fs=SR, output="sos"), x)


def record(dry):
    mix = thinned(dry)
    return top_cut(mix)


dry = scene()
out = record(dry)
generate_wav(out)
```